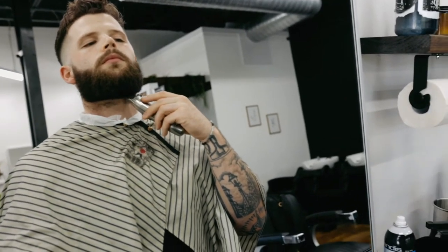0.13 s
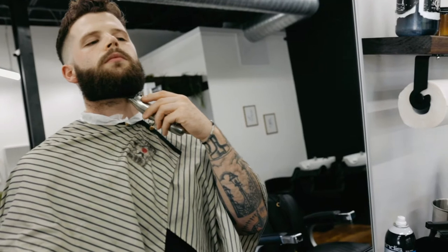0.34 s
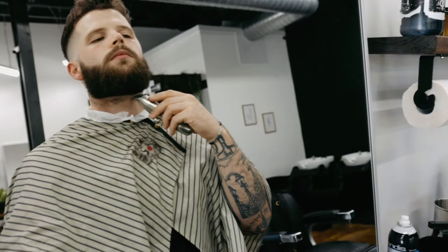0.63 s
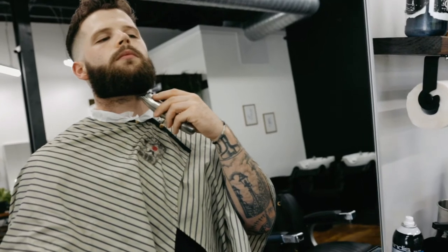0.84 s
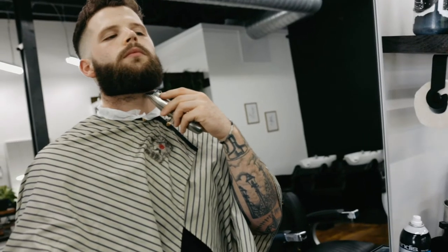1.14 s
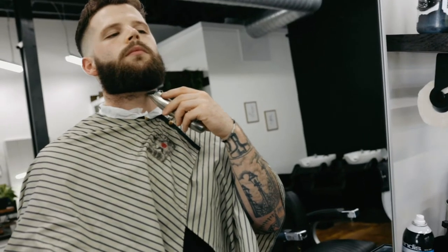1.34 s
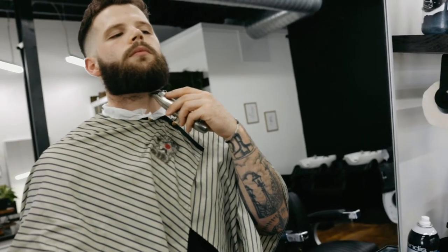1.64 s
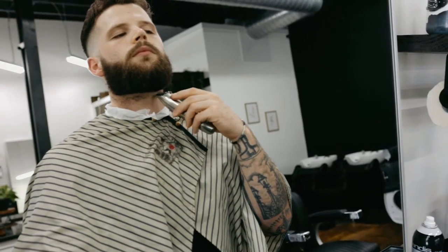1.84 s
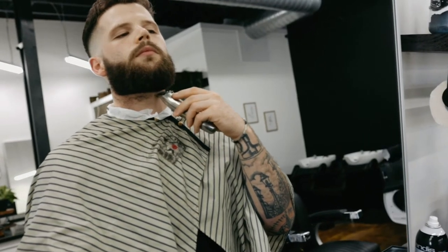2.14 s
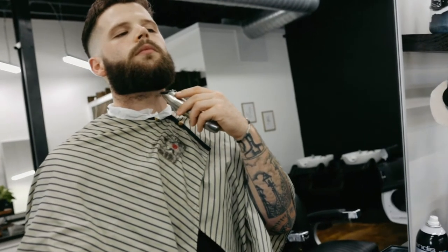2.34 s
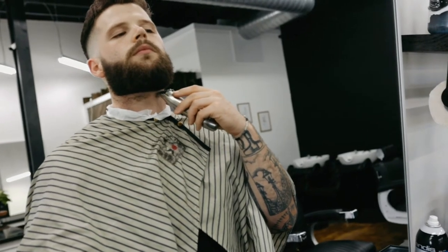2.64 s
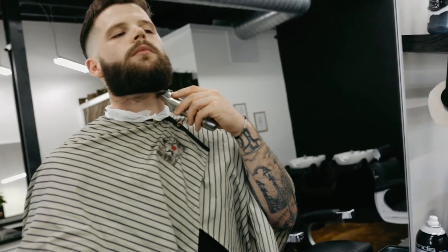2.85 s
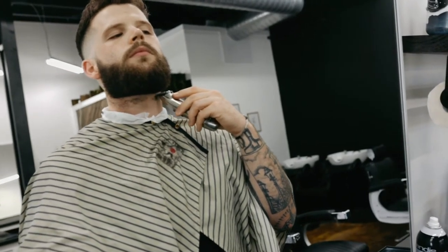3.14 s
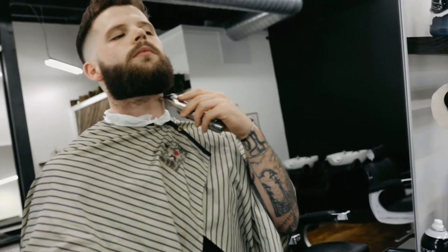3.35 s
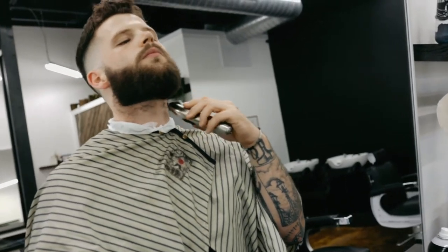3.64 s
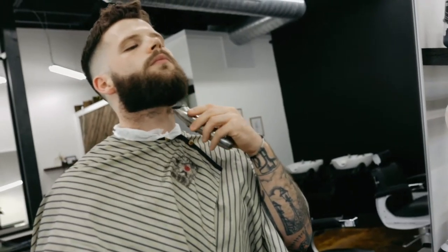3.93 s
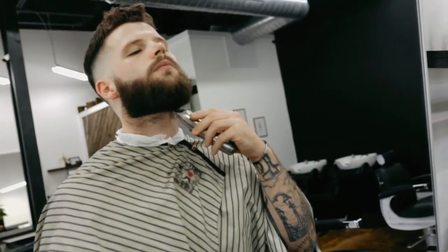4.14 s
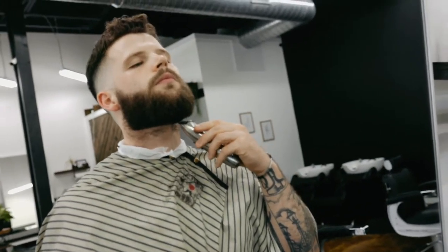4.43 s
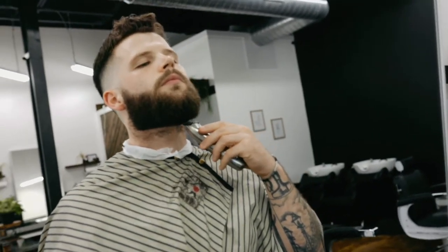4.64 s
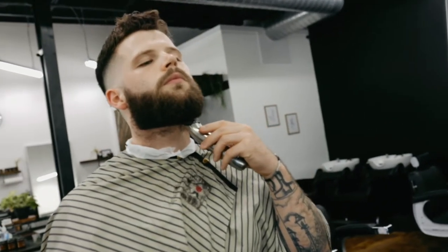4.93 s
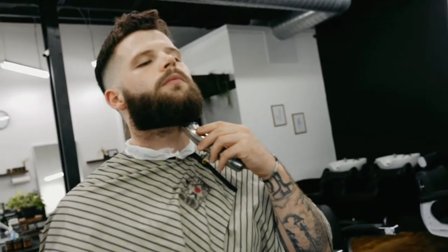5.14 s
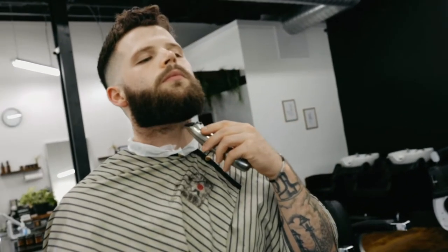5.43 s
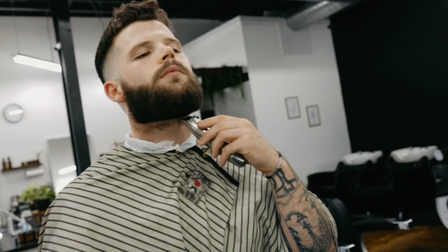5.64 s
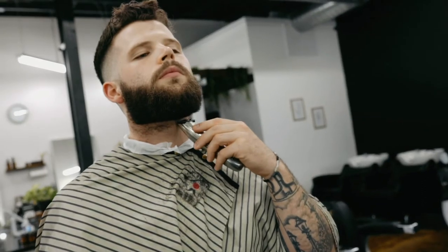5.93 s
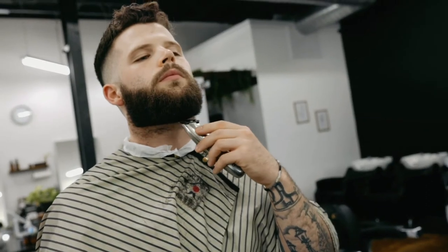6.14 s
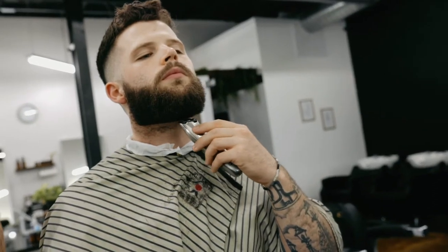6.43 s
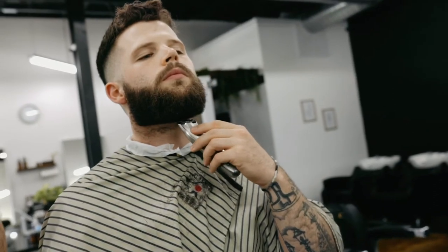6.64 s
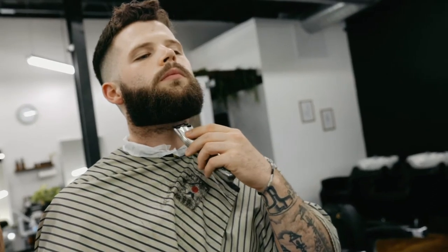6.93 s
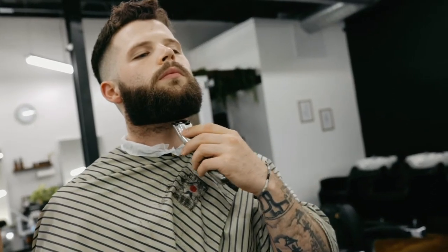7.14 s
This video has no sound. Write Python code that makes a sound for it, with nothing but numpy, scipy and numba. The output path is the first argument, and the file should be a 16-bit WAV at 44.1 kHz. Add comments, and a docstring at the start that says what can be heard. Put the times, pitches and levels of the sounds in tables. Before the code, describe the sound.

In a quiet barbershop, a trimmer already running buzzes close to the microphone from start to end. Rapid ticking teeth fuse into a hard, bright drone with steely ringing and a thin low hum. Clusters of hair snaps crackle early, more strongly in the middle, then intermittently later, each loading the motor a little. Between them the buzz is smooth. Almost no room echo, just a faint airy background.

```python
"""Quiet shop: a rotary beard trimmer buzzes close to a microphone, over a faint hush and a faint wide hiss,
both filtered noise. The motor swings the blade out and back once a turn; on each stroke the teeth tick past
the comb and ring the steel head, while the case hums on the motor's orders.
Hair in the teeth slows the motor, shakes the ticks out of step and snaps with a crackle."""
import sys
import numpy as np
from scipy import signal
from scipy.fft import rfft, irfft, next_fast_len
from scipy.io import wavfile
from scipy.ndimage import uniform_filter1d
from numba import njit

SR = 44100
rng = np.random.default_rng(int(sys.argv[2]) if len(sys.argv) > 2 else 0)


def unload_wav(signal):
    """Save mono or channel-first audio to the path in sys.argv[1] as 16-bit WAV at rate SR, clipped to [-1, 1]."""
    wavfile.write(
        sys.argv[1],
        SR,
        np.round(np.clip(np.atleast_2d(signal).T, -1, 1) * 32767).astype(np.int16),
    )


N = 321489


def undb(db):
    """Decibels to amplitude gain."""
    return 10 ** (np.asarray(db) / 20)


def curve(table, at_s):
    """Columns of a time table, interpolated linearly at the given times."""
    time_s, *columns = np.transpose(table)
    return [np.interp(at_s, time_s, column) for column in columns]


def drift(count, hold_steps, channels):
    """Slow random wander of spread 1, one row per step, renewed about every hold_steps."""
    size = max(int(hold_steps), 1)
    x = rng.standard_normal((count + 4 * size, channels))
    x = uniform_filter1d(uniform_filter1d(x, size, axis=0), size, axis=0)
    x = x[2 * size:2 * size + count]
    return x / x.std()


@njit
def band_pass(x, g, k):
    """State-variable band-pass whose centre may move; g is the warped centre, k is width over centre."""
    y, band, low = np.empty(len(x)), 0., 0.
    for i in range(len(x)):
        v = (band + g[i] * (x[i] - low)) / (1 + g[i] * (g[i] + k[i]))
        band, low = 2 * v - band, low + 2 * g[i] * v
        y[i] = k[i] * v
    return y


def ring(x, hz, width_hz):
    """Resonance applied three times, so its flanks are steep."""
    g = np.tan(np.pi * hz / SR) + np.zeros(N)
    k = width_hz / hz + np.zeros(N)
    for _ in range(3):
        x = band_pass(x, g, k)
    return x


def clicks(time_s, gain):
    """Impulses between samples, drawn as short windowed sincs."""
    place = np.clip(time_s * SR, 8, N - 9)[:, None]
    index = place.astype(int) + np.arange(-7, 9)
    lag = index - place
    taps = np.sinc(lag) * np.cos(np.pi * lag / 16) ** 2 * gain[:, None]
    return np.bincount(index.ravel(), taps.ravel(), N)


def even_level(x):
    """Running rms held at 1, looking over a dozen turns."""
    span = SR // 9
    power = uniform_filter1d(uniform_filter1d(x ** 2, span), span)
    return x / np.sqrt(power + 1e-12)


def near_echoes():
    """Chin, hand and cape throw each tick back: the tick, then a quickly fading random scatter."""
    echo_db, echo_t60_s = -15, .05
    s = np.arange(1, SR // 20) / SR
    tail = rng.standard_normal(len(s)) * undb(-60 * s / echo_t60_s)
    return np.append(1, undb(echo_db) * tail / np.sqrt(np.sum(tail ** 2)))


def hair_load(t):
    """Crackle gain and motor drag (Hz): each bite rises, holds unevenly and falls; the motor lags the load."""
    # teeth biting into hair: start_s, length_s, crackle_gain_db, load_hz (speed drop aimed at)
    hair_bites = [(0.157, 0.097, -57, 0.79), (0.273, 0.029, -52.5, 0.39), (0.33, 0.064, -54.5, 0.67),
                  (.42, 0.077, -64, 0.31), (0.557, 0.064, -55.5, 0.62), (0.96, 0.12, -56, 0.49),
                  (1.373, 0.02, -55, 0.11), (1.568, 0.056, -60, 0.39), (1.719, 0.05, -57.5, 0.72),
                  (1.805, 0.058, -51.5, 1.06), (1.981, 0.11, -51, 1.21), (2.223, 0.09, -55.5, 0.69),
                  (2.592, 0.058, -59.5, 0.11), (2.847, 0.14, -55.5, 0.46), (3.087, 0.081, -53.5, 0.94),
                  (3.321, 0.055, -51.5, 1.55), (3.39, 0.063, -58, 0.35), (4.54, 0.63, -69.5, 0.094),
                  (4.581, 0.026, -64, 0.42), (4.629, 0.035, -65, 0.29), (4.687, 0.12, -59, 0.534),
                  (4.817, 0.15, -56, 0.86), (4.955, 0.15, -62, 0.36), (5.171, 0.06, -59, 0.27),
                  (5.265, 0.11, -56, 0.63), (5.93, 0.012, -57, 0.1), (6.01, 0.04, -61, 0.18),
                  (6.706, 0.02, -54, 0.093), (6.749, 0.035, -54, 0.36), (6.798, 0.077, -55, 0.72),
                  (6.882, 0.052, -55, 0.83)]
    # single hairs between the bites: centre_s, crackle_gain_db
    stray_hairs = [(.12, -69), (.7, -63), (.79, -61), (0.841, -69), (1.13, -66), (1.189, -63), (1.45, -67),
                   (2.43, -67), (2.48, -63), (2.751, -62), (3.51, -65), (3.768, -67), (3.86, -58),
                   (5.51, -71), (5.6, -62), (5.8, -69), (6.09, -67), (6.38, -71), (6.45, -69), (6.49, -63),
                   (6.54, -69), (6.65, -71), (7.04, -65)]
    stray_s, edge_s, motor_lag_s = 0.017, .024, 0.0524
    flutter_db, flutter_s = 1.3, .012
    # a faint crackle that never quite stops
    stubble_db, stubble_flicker_db, stubble_s = -77, 5, .02

    strays = [(centre_s - stray_s / 2, stray_s, gain_db, 0) for centre_s, gain_db in stray_hairs]
    gain, load_hz = np.zeros(N), np.zeros(N)
    for start_s, length_s, gain_db, slow_hz in hair_bites + strays:
        on = (t > start_s) & (t < start_s + length_s)
        gain = gain + undb(gain_db) * on
        load_hz = load_hz + slow_hz * on

    edge = int(edge_s * SR)
    gain = np.maximum(uniform_filter1d(uniform_filter1d(gain, edge), edge // 2), 0)
    gain = gain * undb(flutter_db * drift(N, flutter_s * SR, channels=1)[:, 0])
    stubble_flicker = stubble_flicker_db * drift(N, stubble_s * SR, channels=1)[:, 0]
    gain = gain + undb(stubble_db + stubble_flicker)

    keep = np.exp(-1 / (motor_lag_s * SR))
    return gain, signal.lfilter([1 - keep], [1, -keep], load_hz)


def motor_turns(t, drag_hz):
    """Turns completed: free speed less the hair's drag, summed over time."""
    # motor with no hair in the teeth: time_s, speed_hz
    free_speed = [(0, 108.3), (.13, 108.3), (.4, 108.05), (1.4, 108.08), (1.9, 107.85), (2.44, 107.65),
                  (2.82, 107.5), (3.05, 107.3), (3.5, 107.45), (3.8, 107.55), (3.93, 107.3), (4.25, 107.62),
                  (4.55, 107.57), (5.15, 107.3), (5.5, 107.55), (6.1, 107.45), (6.2, 107.68),
                  (6.75, 107.65), (7.29, 107.43)]
    return np.cumsum(curve(free_speed, t)[0] - drag_hz) / SR


def blade(t, turn, crackle_gain):
    """Teeth tick and ring the head, each ring in its own slowly shifting balance; hair jolts each tick."""
    # teeth meeting the comb on the way out: share_of_turn, tick_db
    teeth = [(.215, -12), (.28, -6), (.335, 0), (.39, -9), (.455, -15), (.55, -19), (.63, -20)]
    # head rings below the main one: centre_hz, width_hz
    lower_rings = [(3150, 800), (2300, 600), (2760, 560), (3560, 800), (4100, 600), (4680, 650)]
    # head rings above the main one: centre_hz, width_hz
    upper_rings = [(6153, 690), (6956, 1160), (8550, 1150)]
    # main ring slides as the head tilts: time_s, centre_hz
    main_ring = [(0, 5270), (1.5, 4900), (1.9, 5060), (2.6, 5100), (3.1, 5097), (5.7, 5160), (6.5, 4790),
                 (7.29, 4947)]
    # rings come and go as the head turns in the hand: time_s, then level_db (rms) of lower, main, upper
    ring_levels = [(0.0, -50, -60, -63, -57, -62, -49, -44, -53, -51, -61),
                   (0.12, -56, -60.5, -57, -51.5, -61, -47, -44, -54, -51.5, -58),
                   (0.2, -56, -60, -55, -53, -63, -51, -52, -49, -49, -64),
                   (0.24, -61, -63, -57, -52.5, -70, -45.5, -44, -57, -51, -57),
                   (0.47, -56, -62, -60, -53, -56, -51, -49, -49.5, -51, -58.5),
                   (0.71, -56, -62.5, -57, -50.5, -61, -46.5, -49, -51.5, -50.5, -59),
                   (1.52, -53.5, -62, -61.5, -55, -64, -46.5, -46, -53.5, -48.5, -58.5),
                   (1.78, -55.5, -60.5, -58, -60, -56, -48, -45.5, -54, -48, -60),
                   (1.85, -51, -58, -62, -65, -61, -54, -44.5, -56, -53, -65),
                   (1.93, -53.5, -61, -71, -63, -59, -53, -46, -48, -48, -59),
                   (2.07, -53.5, -57, -65, -67, -58, -53, -45.5, -58, -53, -62),
                   (2.15, -51.5, -64, -71, -65, -60, -52, -48, -45, -48.5, -59),
                   (2.27, -52.5, -57, -68, -65, -61, -56, -44.5, -52, -53, -57),
                   (2.35, -53.5, -61, -68, -56, -64, -52, -46.5, -49, -49, -63),
                   (2.58, -53, -60, -65, -70, -58, -56, -46, -48.5, -51.5, -57.5),
                   (2.8, -55, -63, -68, -64, -59, -53, -50, -50.5, -51, -59),
                   (2.88, -55, -62, -65, -70, -66, -54, -57, -47, -53, -60),
                   (2.98, -55, -63, -69, -64, -60, -52, -59, -51, -53, -58),
                   (3.06, -55, -63, -65, -68, -67, -53, -61, -52, -48, -57),
                   (3.13, -53, -64, -71, -66, -62, -48.5, -65, -52, -53.5, -58),
                   (3.25, -57, -63, -65, -65, -62, -51, -64, -54, -48, -54),
                   (3.33, -56, -65, -65, -61, -63, -47.5, -67, -60, -51.5, -58),
                   (3.47, -59, -64, -59, -56, -63, -49.5, -48, -58, -49.5, -59),
                   (3.55, -56, -64, -59, -59, -61, -50.5, -50, -47.5, -48.5, -54),
                   (3.69, -57, -63, -58, -58, -57, -43, -55, -48, -54, -54),
                   (3.82, -55, -63.5, -57, -59, -56, -47.5, -46.5, -50, -53, -54),
                   (4.02, -59, -61.5, -54.5, -55.5, -55.5, -51, -49.5, -53, -50.5, -56),
                   (4.39, -54.5, -62, -56.5, -55, -56, -50, -48.5, -50, -49.5, -54.5),
                   (4.59, -66, -65, -53.5, -53, -61, -49, -53, -55, -47, -56),
                   (4.91, -57, -63.5, -57.5, -56.5, -57, -47, -49, -49.5, -50, -61),
                   (5.2, -50.5, -63.5, -64, -64, -55.5, -46, -51, -56, -48.5, -58),
                   (5.6, -51, -62, -83, -62, -57, -46.5, -50.5, -53.5, -48, -59),
                   (5.91, -49.5, -63, -77, -76, -58, -49, -51, -47.5, -47.5, -60),
                   (6.05, -49, -60.5, -75, -70, -62, -45, -47.5, -47.5, -50, -60),
                   (6.17, -50, -63.5, -70, -79, -60, -47, -51, -49, -46.5, -62),
                   (6.58, -47.5, -62.5, -76, -76, -53, -49.5, -44.5, -45, -48.5, -56),
                   (6.82, -48.5, -61, -67, -76, -62, -53, -45.5, -45.5, -49.5, -58),
                   (7.0, -47, -60.5, -75, -63, -69, -46.5, -48, -45, -51.5, -55.5),
                   (7.17, -49, -66, -65, -72, -56, -50, -59, -48.5, -47, -56),
                   (7.29, -51, -65, -60, -66, -52, -51, -52, -46, -50, -55)]
    # return stroke over outward: time_s, then return_gain_db of lower, main, upper
    return_gains = [(0, 1.5, 7.0, 12.0, 6.5, -0.5, -0.5, -6.5, 1.5, -5.5, -9.0),
                    (0.45, 0.5, 4.0, 3.5, 4.0, -3.0, -3.5, -8.0, 2.5, -2.0, -4.0),
                    (0.9, 5.0, 7.5, 8.5, -1.5, 1.0, 0.5, -4.0, -6.0, -5.5, -4.5),
                    (1.3, 9.5, 9.0, 11.0, -2.0, -3.0, -1.5, -5.5, -1.0, -9.0, -5.0),
                    (1.65, 8.0, 6.5, 7.5, 2.5, -2.5, -2.0, -7.0, 1.5, -5.5, -3.5),
                    (2.15, 3.5, 2.5, 2.5, 3.0, -2.5, -3.0, -6.5, -1.0, -1.5, -0.5),
                    (2.5, 5.0, 4.5, -0.5, 4.0, -2.5, -2.0, -9.5, -3.0, -2.5, -1.0),
                    (3.0, -1.0, 3.0, 3.0, 3.5, -3.5, -2.5, -3.0, 2.0, -0.5, -5.5),
                    (3.25, -1.0, 2.5, 3.0, 5.0, -3.0, -1.5, -2.0, 1.0, -3.5, -6.5),
                    (3.7, -1.0, 3.0, 4.0, 3.0, -4.0, -3.0, -4.5, -3.0, -4.0, -2.5),
                    (4.1, 3.0, 4.5, 10.5, -1.0, -1.5, -2.0, -7.5, -5.0, -1.5, -6.0),
                    (4.45, 3.0, 4.5, 8.0, -0.5, -3.5, -8.5, -7.0, -5.0, -2.0, -7.0),
                    (4.9, 1.5, 3.5, 3.0, 3.0, -1.0, -5.0, -5.5, 1.0, -1.5, -1.5),
                    (5.2, 4.5, 3.5, 3.5, 4.5, 1.0, -2.5, -6.5, 1.5, -2.5, -4.0),
                    (5.6, 8.5, 5.0, 4.5, 7.0, 1.0, -1.0, -4.5, -2.5, -3.5, -7.0),
                    (6.2, 12.0, 5.0, 5.5, 6.0, 1.5, -2.5, -6.0, -4.5, -7.0, 1.5),
                    (6.5, 12.0, 4.0, 7.5, 6.0, 1.5, -2.5, -7.5, -3.5, -5.0, -1.5),
                    (7.0, 12.0, 4.0, 5.5, 4.5, 1.0, -4.0, -7.5, -3.0, -0.5, -3.5),
                    (7.29, 12.0, 4.0, 6.5, 4.5, -1.0, 1.5, -9.5, -2.5, 1.0, -1.5)]
    # steady rings: centre_hz, width_hz, level_db (rms), return_gain_db
    steady_rings = [(5444, 920, -53, 0.5), (8180, 306, -59.5, 1), (9550, 6400, -67, -6),
                    (11520, 13000, -82.5, -1)]
    main_width_hz = 800
    return_turn = .498  # the return stroke repeats the teeth this much later
    # scatter of tick times: running free; most that hair adds, neared above this crackle gain
    idle_shake_s, hair_shake_s, shake_at_db = 3.6e-6, 14e-6, -57

    share, tick_db = np.transpose(teeth)
    share, tick_db = np.append(share, share + return_turn), np.tile(tick_db, 2)
    returning = np.repeat([0, 1], len(teeth))
    whole_turns = np.arange(-1, np.ceil(turn[-1]))
    tick_s = np.interp(whole_turns[:, None] + share, turn, t)
    heard = (tick_s > 0) & (tick_s < t[-1])
    count = len(tick_s)

    bite = np.interp(tick_s, t, crackle_gain) / undb(shake_at_db)
    shake_s = idle_shake_s + hair_shake_s * np.tanh(bite ** 2)
    rings = lower_rings + [(curve(main_ring, t)[0], main_width_hz)] + upper_rings
    return_curves = curve(return_gains, tick_s)  # read before the ticks are displaced
    moving = [(hz, width_hz, level_db, return_db) for (hz, width_hz), level_db, return_db
              in zip(rings, curve(ring_levels, t), return_curves)]
    rings = moving + steady_rings

    # slow slip: one part common to both strokes, one for each tick of the turn
    slip_s = 15e-6 * np.tile(drift(count, 110, channels=len(teeth)), 2)
    slip_s = slip_s + 5e-6 * drift(count, 151, channels=len(share))
    tick_s = tick_s + slip_s + shake_s * rng.standard_normal(tick_s.shape)
    # a shaken tick also lands harder or softer
    jolt_db = 4e4 * shake_s * rng.standard_normal(tick_s.shape)

    # neighbouring rings swing in opposite senses, so they add up between their peaks
    rank = np.argsort(np.argsort([np.mean(row[0]) for row in rings]))
    senses = (-1) ** rank
    push = 1 - 2 * returning  # the return stroke pushes the other way
    out, blur = 0, near_echoes()
    for (hz, width_hz, level_db, return_db), sense in zip(rings, senses):
        both_db = 1.5 * np.tile(drift(count, 126, channels=len(teeth)), 2)
        own_db = 1.2 * drift(count, 110, channels=len(share))
        own_db = own_db + 1.8 * drift(count, 25, channels=len(share))
        gain = sense * push * undb(tick_db + returning * return_db + both_db + own_db + jolt_db)
        rung = ring(clicks(tick_s[heard], gain[heard]), hz, width_hz)
        out = out + undb(level_db) * even_level(signal.oaconvolve(rung, blur)[:N])
    return out


def case_hum(t, turn):
    """Case hums as sines on whole motor orders; all but the 5th and 7th waver with the hold of the fingers."""
    # hum as the grip changes: time_s, seventh_order_db (rms), fifth_order_db (rms)
    grip = [(0, -61.5, -69.5), (.6, -60.5, -72), (1.7, -59.5, -75.5), (2.58, -59, -75.5),
            (3.15, -62.5, -71), (3.5, -63.5, -73), (4.8, -63.5, -72.5), (5.25, -58.5, -76),
            (5.87, -57.5, -82), (6.3, -58.5, -86), (6.68, -59, -83), (6.92, -58, -74.5), (7.29, -59, -82)]
    # orders of constant mean level: order, level_db (rms)
    steady_orders = [(1, -93), (2, -87.5), (4, -92), (16, -79), (19, -95)]
    # motor orders whose levels follow the grip: order
    held_orders = (6, 8, 9, 10, 11, 12, 13, 14, 15, 17, 18)
    # grip changes: time_s, then level_db (rms) of each held order
    held_levels = [(0, -72, -86, -79, -88.5, -77, -78, -66, -75.5, -84, -85, -75),
                   (0.8, -72.5, -76, -74, -99, -74, -76, -67.5, -71, -76.0, -66, -73),
                   (1.5, -72, -73, -74, -88.0, -74.5, -80, -67.5, -74, -70, -72.5, -68),
                   (2.45, -75, -76, -72.5, -82.0, -72, -73, -75.0, -74, -67, -61, -101),
                   (3.25, -78.5, -73, -73, -83, -73, -74, -75, -74, -67.5, -62, -74.5),
                   (4.1, -80.0, -76, -72.5, -81.0, -77, -75, -72, -92, -67, -71, -70),
                   (4.9, -79, -75, -71, -78.0, -75, -72.5, -76.0, -77.0, -68.5, -67, -64),
                   (5.7, -74, -81, -73, -84.5, -80, -73, -71, -71, -66.5, -64, -94),
                   (6.4, -73, -77, -77, -84, -74, -74, -65.5, -72, -70, -66, -81),
                   (7.29, -74, -75, -72, -78, -76, -71, -65, -74, -70, -66, -77)]

    seventh_db, fifth_db = curve(grip, t)
    out = undb(seventh_db) * np.sin(2 * np.pi * 7 * turn)
    out = out + undb(fifth_db) * np.sin(2 * np.pi * 5 * turn)

    step_s = np.linspace(0, t[-1], 200)
    orders = steady_orders + list(zip(held_orders, curve(held_levels, step_s)))
    waver = drift(len(step_s), 8, channels=len(orders))
    start_turn = rng.random(len(orders))
    for k, (order, level_db) in enumerate(orders):
        gain = np.interp(t, step_s, undb(level_db + 1.5 * waver[:, k]))
        out = out + gain * np.sin(2 * np.pi * (round(order) * turn + start_turn[k]))
    return np.sqrt(2) * out  # rms levels to sine peaks


def hair_crackle(t, turn, crackle_gain):
    """Hairs snap densely at random, mostly as each stroke closes; each snap rings in the hair's colours."""
    # rings of a snapping hair: centre_hz, width_hz, relative_level_db
    snap_rings = [(648, 200, -17.5), (748.8, 64, -15), (1035, 350, -16.5), (1580, 510, -7), (2004, 790, -3),
                  (2800, 430, -11), (3254, 1250, -1.5), (4200, 1040, -5.5), (6100, 1860, 1),
                  (8600, 2400, -5.5)]
    # colour shifts as the head turns: time_s, then gain_db of the first eight snap rings
    snap_colour = [(0, 5, 4, -2.5, -0.37, -0.57, 2.6, 4, -5), (2, -0.5, 0, 0, 0, 0.28, -1.8, 0, -4.5),
                   (3.1, -3, -3, 1, 0.065, -1.05, -2.05, -1, 3), (4.8, -3.5, 2, 6, -1.6, 0.44, 2, 0, 2.5),
                   (6.8, -1, 0, -4, -0.12, 0.24, -0.77, -1, 10)]

    # two closings a turn, slightly unequal
    closing = 1 + 0.94 * np.cos(4 * np.pi * (turn - .04)) + 0.11 * np.cos(2 * np.pi * (turn - .56))
    snaps = closing * (rng.random(N) < .11)
    crackle = 0
    for (hz, width_hz, level_db), turn_db in zip(snap_rings, curve(snap_colour, t) + [0, 0]):
        rung = ring(snaps * rng.standard_normal(N), hz, width_hz)
        crackle = crackle + undb(level_db + turn_db) * rung / rung.std()
    return crackle_gain * crackle


def coloured_noise(points):
    """White noise filtered to the density of (hz, db_per_hz) points."""
    size = next_fast_len(N)
    hz = np.maximum(np.fft.rfftfreq(size, 1 / SR), 1)
    at_hz, density_db = np.transpose(points)
    gain = undb(np.interp(np.log(hz), np.log(at_hz), density_db)) * np.sqrt(SR / 2)
    return irfft(rfft(rng.standard_normal(N), size) * gain, size)[:N]


def shop_hush():
    """Faint hush of the shop, common to both channels: noise that thins out towards the treble."""
    # hush: frequency_hz, density_db_per_hz
    hush_density = [(20, -82), (35, -96), (50, -96.5), (150, -103), (280, -104), (450, -110), (1500, -110),
                    (5000, -112), (10000, -113), (14000, -115)]
    return coloured_noise(hush_density)


def side_hiss():
    """Independent faint hiss, strongest near 8 kHz, to be added left and subtracted right."""
    # hiss: frequency_hz, density_db_per_hz
    hiss_density = [(20, -112), (100, -113), (400, -117), (650, -130), (3500, -132), (5500, -119),
                    (7800, -110), (10000, -111), (12200, -116), (13200, -135)]
    return coloured_noise(hiss_density)


def scene():
    """Trimmer dead centre over the hush of the shop, with a faint hiss opposed left to right."""
    t = np.arange(N) / SR
    crackle_gain, drag_hz = hair_load(t)
    turn = motor_turns(t, drag_hz)
    trimmer = blade(t, turn, crackle_gain) + case_hum(t, turn) + hair_crackle(t, turn, crackle_gain)
    mid = trimmer + shop_hush()
    side = side_hiss()
    return np.array([mid + side, mid - side])


def record(dry):
    """Microphone softens the highest treble; the recorder cuts the top steeply."""
    soft_hz, top_hz = 10330, 14350
    soft = signal.sosfilt(signal.butter(2, soft_hz, fs=SR, output="sos"), dry)
    return signal.sosfilt(signal.ellip(10, .2, 60, top_hz, fs=SR, output="sos"), soft)


dry = scene()
out = record(dry)
unload_wav(out)
```